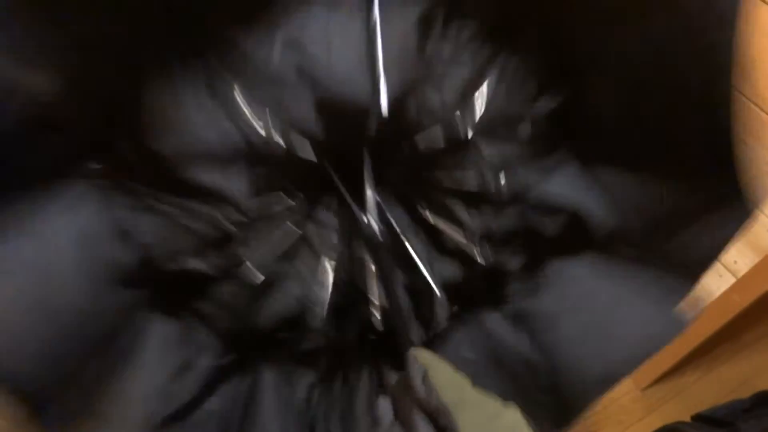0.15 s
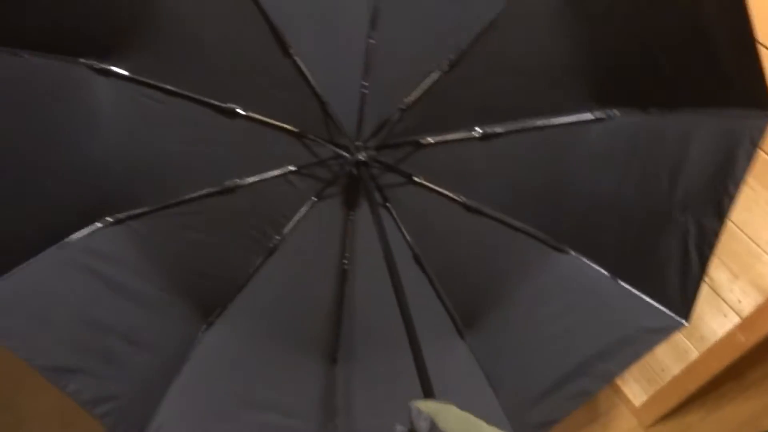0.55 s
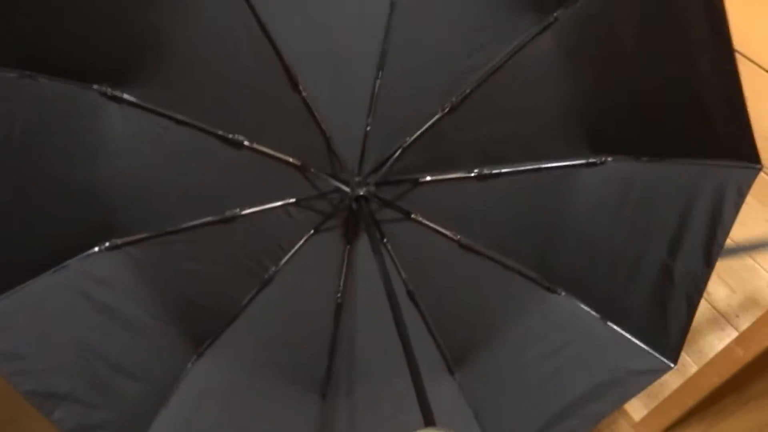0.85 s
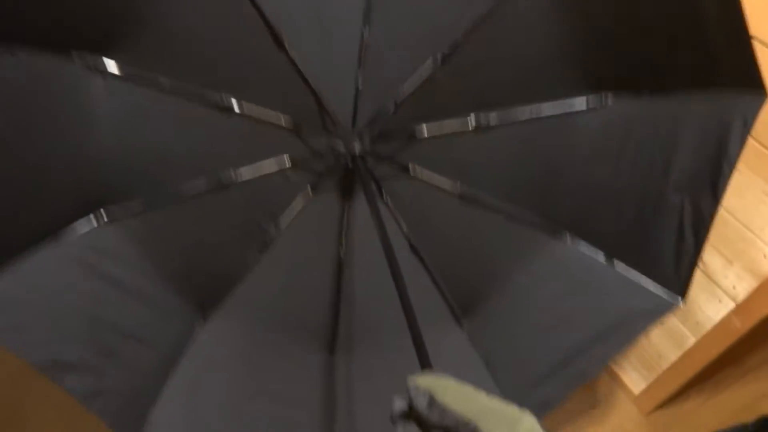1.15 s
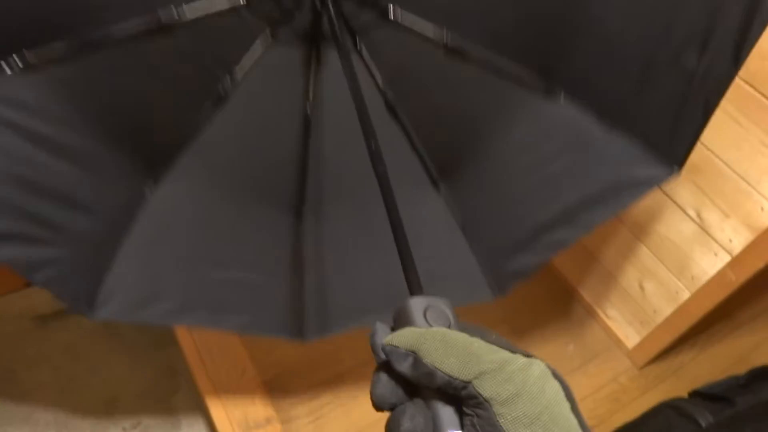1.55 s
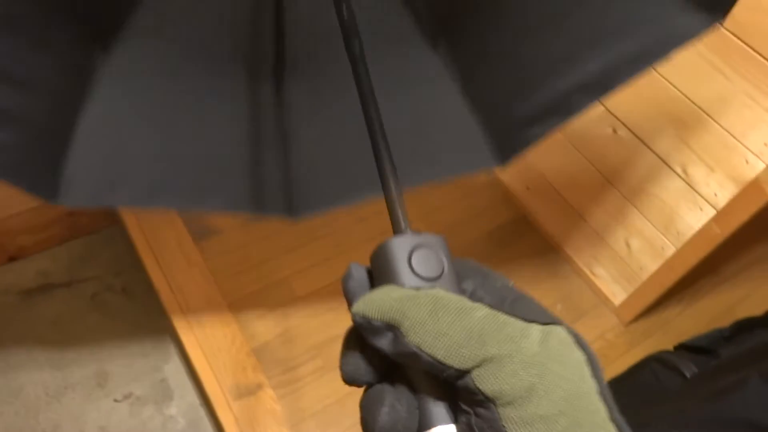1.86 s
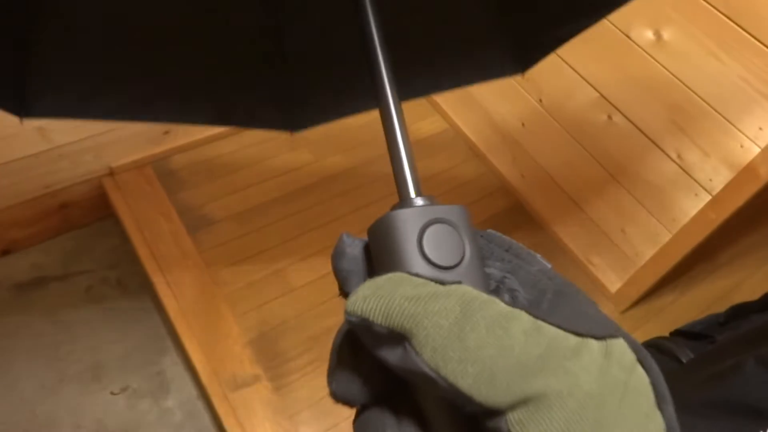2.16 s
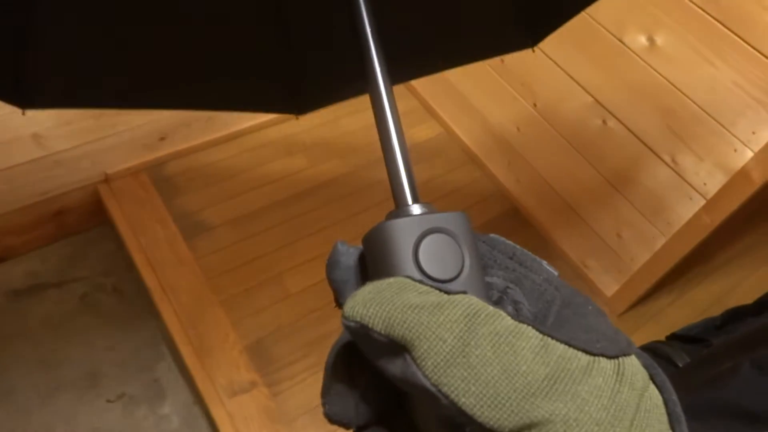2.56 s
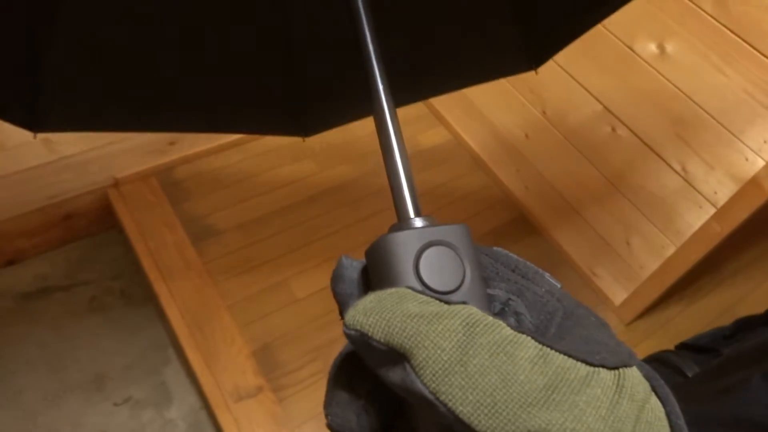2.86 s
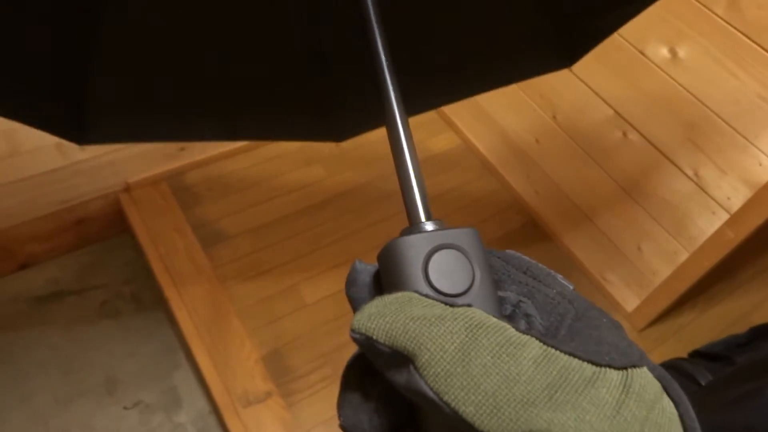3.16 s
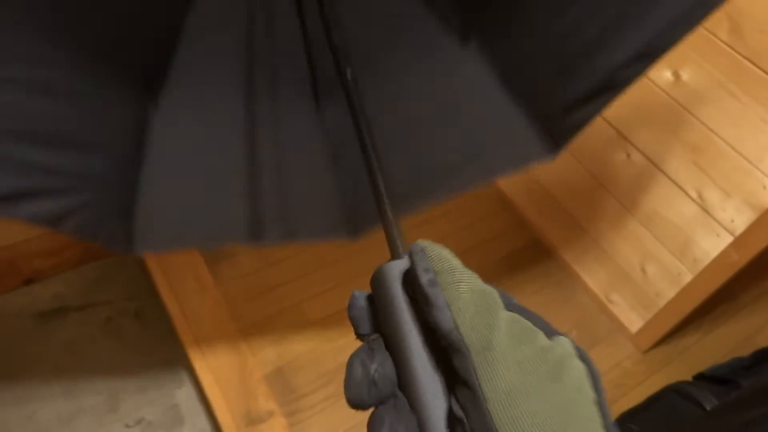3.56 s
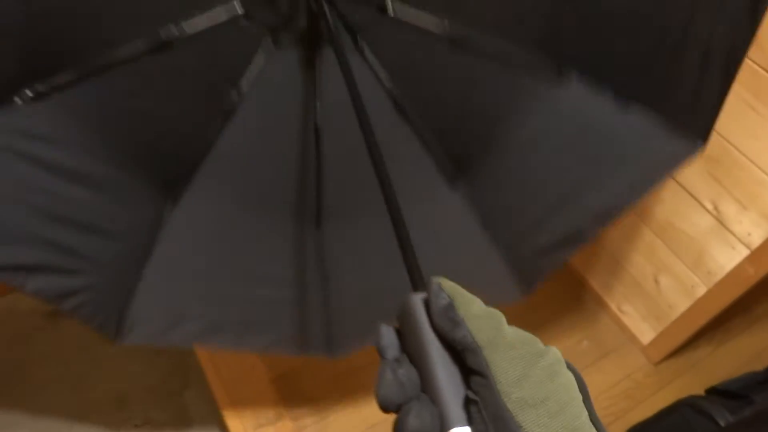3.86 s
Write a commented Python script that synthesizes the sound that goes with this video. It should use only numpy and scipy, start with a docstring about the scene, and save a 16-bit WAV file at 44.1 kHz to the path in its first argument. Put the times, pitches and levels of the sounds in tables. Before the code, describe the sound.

An automatic umbrella springs open with a loud snap, followed by faint ticks and rubbing.

```python
"""Automatic umbrella springing open

Close by in a small wood-panelled room, the steel runner scrapes up the shaft and the ribs clatter.
Folds of cloth crackle, the panels flap taut and drum on the canopy, and the catch snaps home.
Then the frame ticks and knocks as it settles, a gloved hand bumps the handle, and a light rub
makes the canopy drone and its weave hiss with a thin, gliding zip, over faint room tone."""
import sys
import numpy as np
from scipy import signal
from scipy.fft import rfft, irfft, next_fast_len
from scipy.io import wavfile
from scipy.ndimage import uniform_filter1d

SR = 44100
rng = np.random.default_rng(int(sys.argv[2]) if len(sys.argv) > 2 else 0)


def to_wav(sig):
    """Store sig (one row per channel, or 1-D mono) as 16-bit WAV at the path in sys.argv[1].

    Samples outside -1..1 are clipped; the rate is SR.
    """
    pcm = np.clip(np.atleast_2d(sig), -1, 1) * 32767
    pcm = np.round(pcm).astype(np.int16)
    wavfile.write(sys.argv[1], SR, pcm.T)  # frames by channels


N = 176400
T = np.arange(N) / SR

# drum-like ring of the taut canopy: f/Hz, width/Hz, level/dB
CANOPY_MODES = [(139, 16, 1), (327.5, 22, 12), (407, 15, -1.5), (766, 61, 2.5)]
# bright tone of the frame's joints: f/Hz, level/dB
JOINT_TONE = [(400, -5.5), (4700, -8.5), (6300, -0.5), (11000, -6)]
# fuller tone of the catch and handle: f/Hz, level/dB
CLICK_TONE = [(100, -16.5), (500, -4.5), (2300, -6.5), (3600, -4), (4900, -8), (6500, 0), (11000, -7)]


def runner(per_s=6000, spread_db=3):
    """Steel slides on steel: dense contacts ring the shaft and ribs."""
    # envelope of the slide: t/s, level/dB
    slide = [(0, -32.5), (.06, -37), (.145, -32.5), (.195, -32), (.255, -38.5), (.285, -31.5), (.325, -33),
             (.36, -32), (.40, -42), (.48, -59.5)]
    # ring of the steel: f/Hz, level/dB
    steel = [(1000, -15.5), (2600, -10.5), (3800, -7), (4900, -12), (5800, -6.5), (6700, -1), (7600, -5),
             (8700, -2), (10000, -9), (11000, -13)]
    mid, side = [colour(grains(per_s, spread_db) * level(slide), steel) for _ in range(2)]
    return stereo(mid, side, pan_db=0.5)


def cloth(per_s=2500, spread_db=3, ring_db=-6.5):
    """Folds crackle as they are dragged apart, and ring the canopy."""
    # envelope of the unfolding: t/s, level/dB
    unfold = [(0, -48.5), (.14, -50), (.2, -39), (.28, -35), (.35, -37.5), (.395, -38), (.43, -46),
              (.465, -45.5), (.51, -54.5)]
    # tone of the rustle: f/Hz, level/dB
    rustle = [(100, -16), (300, -3), (800, 0.5), (2300, -6.5), (3600, -10.5), (11000, -27.5)]
    folds = np.array([grains(per_s, spread_db) for _ in range(2)]) * level(unfold)
    folds = folds + from_db(ring_db) * canopy_ring(folds)
    return stereo(*colour(folds, rustle), pan_db=-1.25, side_db=-7)


def canopy(per_s=700, spread_db=2):
    """Panels flap taut and drum on the canopy."""
    # swell as the canopy fills: t/s, level/dB
    fill = [(0, -58.5), (.13, -61), (.2, -39), (.27, -39.5), (.322, -32.5), (.385, -27), (.41, -31.5),
            (.46, -43), (.5, -76)]
    # bassy body of the flap: f/Hz, level/dB
    body = [(20, -6), (85, -9.5), (135, 2), (260, -3.5), (600, -13), (1200, -26), (4000, -44.5)]
    flaps = grains(per_s, spread_db)
    return rms_one(colour(flaps + canopy_ring(flaps), body)) * level(fill)


def canopy_ring(x):
    """The stretched cloth rings in its modes like a drumhead."""
    return sum(from_db(db) * resonate(x, hz, width) for hz, width, db in CANOPY_MODES)


def catch():
    """The catch snaps home and rebounds."""
    # snaps: t/s, level/dB, f/Hz, decay/ms
    snaps = [(.3356, -20, 3670, 1.73), (.3376, -13, 6400, 2), (.4371, -24, 3760, 2)]
    return contacts(snaps, CLICK_TONE, ring_width_hz=2200, ring_db=-4)


def ribs():
    """The ribs clash as they spread."""
    # clashes: t/s, level/dB, f/Hz, decay/ms
    clashes = [(.0015, -25, 8750, 2), (.1362, -26.5, 7850, 4), (.1534, -21.5, 8900, 2.7),
               (.1628, -19, 8200, 3.8), (.3322, -20.5, 9700, 2)]
    return contacts(clashes, JOINT_TONE, ring_width_hz=1400, ring_db=2.5)


def joints():
    """Joints slip and tick as the frame settles."""
    # slips: t/s, level/dB, f/Hz, decay/ms
    slips = [(.6283, -42, 7800, 6.7), (1.2296, -43.5, 6800, 2.7), (1.24, -53, 7100, 13),
             (1.271, -46.5, 8800, 1.5), (1.8335, -57, 7040, 6), (1.8455, -53.5, 7060, 7.2)]
    return contacts(slips, JOINT_TONE, ring_width_hz=3000, ring_db=-10)


def frame_knocks(crack_db=-3, crack_s=0.016):
    """The frame shifts under the taut cloth: each knock cracks and rings, a soft one only low modes."""
    # blows, brighter when harder: t/s, level/dB, top f/Hz
    blows = [(1.2306, -47.5, 600), (1.2395, -44.5, 2000), (1.253, -44.5, 616), (1.2748, -51.5, 300)]
    # ring of the frame: f/Hz, level/dB, t60/s
    modes = [(191, -2, 0.17), (273, -3.5, 0.054), (436, 10.5, 0.013), (885, 1.5, 0.023), (1113, -15, 0.11)]
    out, age = np.zeros(N), T[:SR // 2]
    for s, db, top_hz in blows:
        crack = rng.standard_normal(len(age)) * np.exp(-age / crack_s)
        knock = from_db(crack_db) * resonate(crack, hz=2400, width_hz=2800)
        for hz, mode_db, t60 in modes:
            reach = 1 / np.hypot(1, (hz / top_hz) ** 2)
            decay = from_db(mode_db + rng.normal(0, 1) - 60 * age / t60)
            knock += reach * decay * np.sin(2 * np.pi * hz * age)
        out[int(s * SR):][:len(age)] += from_db(db) * knock
    return low_cut(out, hz=140)


def handle_bumps(ring_db=-4):
    """Each soft push gives the handle one dull pulse, and the canopy rings faintly after it."""
    # bumps of the gloved hand: t/s, level/dB, width/ms
    bumps = [(0.857, -45.5, 0.93), (1.076, -53.5, 1.8), (1.102, -48.5, 0.86), (1.588, -48, 1.5),
             (1.691, -56, 1.7), (1.8663, -48, 1.05), (1.876, -47.5, 0.76), (1.883, -46, 0.59)]
    push = np.zeros(N)
    for s, db, width_ms in bumps:
        u = np.clip(1000 * (T - s) / width_ms, 0, 60)  # age in pulse widths
        push += from_db(db) * u * u * (u - 3) * np.exp(-u)
    push = low_cut(push, hz=65)
    return push + from_db(ring_db) * resonate(push, hz=140, width_hz=40)


def handle_ticks():
    """Small, dry contacts at the handle."""
    # ticks: t/s, level/dB, f/Hz, decay/ms
    ticks = [(3.6248, -52, 8140, 5.1), (3.6947, -56.5, 8800, 5.1)]
    return contacts(ticks, CLICK_TONE, ring_width_hz=610, ring_db=-7)


def rub():
    """Light rubbing: the canopy drones and the weave hisses."""
    # envelopes of drone and hiss: t/s, level/dB
    drone_curve = [(1.3, -77), (1.6, -77.5), (1.86, -74.5), (2.0, -80), (2.3, -98), (2.35, -70.5),
                   (2.85, -66.5), (3.22, -68.5), (3.3, -87)]
    hiss_curve = [(2.3, -90), (2.76, -81), (2.84, -67.5), (2.89, -85), (3.08, -82), (3.17, -69.5),
                  (3.26, -78), (3.35, -73.5), (3.6, -68.5), (3.74, -79)]
    # their tones: f/Hz, level/dB
    drone_tone = [(150, -30), (255, -18), (315, 2), (385, -5), (420, -16), (490, -6.5), (720, -39)]
    hiss_tone = [(4000, -25.5), (6600, 3.5), (8400, 2), (11000, -8)]
    drone = colour(rng.standard_normal(N), drone_tone) * level(drone_curve)
    hiss = colour(rng.standard_normal((2, N)), hiss_tone) * level(hiss_curve)
    return drone + stereo(*hiss, pan_db=1)


def weave_zips(waver_hz=35, waver_db=2.2, jitter_hz=60):
    """Threads pass a contact and whistle; an uneven rub makes pitch and level waver together."""
    # glides whose pitch follows the speed of the rub: t/s, f/Hz, level/dB
    main_zip = [(2.42, 6510, -99), (2.478, 7768, -66.5), (2.512, 7130, -82), (2.538, 8020, -54.5),
                (2.558, 7480, -72), (2.646, 7540, -75.5), (2.705, 8000, -66), (2.785, 8120, -70),
                (2.862, 7070, -74), (2.905, 8350, -75.5), (2.973, 7520, -68.5), (3.042, 7640, -69),
                (3.12, 6416, -80)]
    high_arch = [(2.57, 10060, -88), (2.665, 10120, -86), (2.725, 11050, -85), (2.775, 10120, -85),
                 (2.95, 10100, -87)]  # fainter, above it
    falling_slip = [(.52, 8200, -68), (.578, 6900, -66.5)]  # the opened cloth comes to rest
    out = np.zeros(N)
    for glide in (main_zip, high_arch, falling_slip):
        s, hz, _ = np.transpose(glide)
        speed = wobble(length_s=0.025)
        pitch = np.interp(T, s, hz) + waver_hz * speed + jitter_hz * wobble(length_s=0.00074)
        whistle = np.sqrt(2) * np.sin(2 * np.pi * np.cumsum(pitch) / SR)
        out += level(glide) * from_db(waver_db * speed) * whistle
    return out


def room(x, wet_db, build_s=0.004, side_db=-11.5):
    """Add the dense reflections of the wooden walls, each octave dying at its own rate."""
    # reverb time: f/Hz, t60/s
    t60 = [(100, 0.49), (4000, 0.32), (11000, 0.18)]
    t, tail = T[:SR * 3 // 4], 0
    edges = np.geomspace(60, 15360, 9)
    for low, high in zip(edges, edges[1:]):
        octave = signal.butter(2, [low, high], "band", fs=SR, output="sos")
        band = signal.sosfilt(octave, rng.standard_normal((2, len(t))))
        tail = tail + band * from_db(-60 * t / at_hz(t60, np.sqrt(low * high)))
    tail = tail * (1 - np.exp(-t / build_s))
    mid, side = tail / np.sqrt(np.sum(tail[0] ** 2))
    walls = mid + from_db(side_db) * side * [[1], [-1]]
    return x + from_db(wet_db) * signal.fftconvolve(np.atleast_2d(x), walls, axes=1)[:, :N]


def room_tone(level_db=-68.5, peaks_db=3):
    """A faint, airy hiss with steady resonances."""
    # tone of the air and its resonances: f/Hz, level/dB
    air = [(25, -6.5), (160, -1.5), (470, -4), (1050, -4), (2300, -10.5), (3700, -8), (5200, -17.5),
           (7500, -15), (11000, -23.5)]
    peaks = [(325, -5.5), (620, -2.5), (1060, -2.5), (1570, -4), (2000, -1), (3500, -3.5)]
    noise = rng.standard_normal((2, N))
    ring = sum(from_db(peaks_db + db) * resonate(noise, hz, width_hz=45 + 0.04 * hz) for hz, db in peaks)
    mid, side = from_db(level_db) * rms_one(colour(noise + ring, air))
    return stereo(mid, side, pan_db=0)


def contacts(rows, spectrum, ring_width_hz, ring_db):
    """Each contact chatters for a few milliseconds, stops abruptly and favours one ring of the steel."""
    out, t = np.zeros(N + SR), T[:SR // 10]
    for s, db, hz, decay_ms in rows:
        chatter = rng.choice([-1., 1.], len(t))
        ring = rms_one(resonate(chatter, hz, ring_width_hz))
        burst = rms_one(chatter + from_db(ring_db) * ring)
        out[int(s * SR):][:len(t)] += from_db(db) * burst * np.exp(-(1000 * t / decay_ms) ** 2)
    return colour(out[:N], spectrum)


def grains(per_s, spread_db):
    """Random tiny contacts of uneven size; rms 1."""
    sizes = from_db(spread_db * np.minimum(rng.exponential(1, N), 4)) * rng.choice([-1, 1], N)
    return rms_one(sizes * (rng.random(N) < per_s / SR))


def wobble(length_s):
    """Random drift that changes over the given time; rms 1."""
    return rms_one(uniform_filter1d(rng.standard_normal(N), int(length_s * SR)))


def stereo(mid, side, pan_db, side_db=0):
    """Left and right of a broad source, widest in the midrange."""
    # stereo width: f/Hz, side level/dB
    width = [(300, -8), (600, -4.5), (1100, -4.5), (11000, -10.5)]
    sign = np.array([[1], [-1]])
    side = from_db(side_db) * colour(side, width, keep_power=False)
    return (mid + sign * side) * from_db(sign * pan_db / 2)


def colour(x, spectrum, keep_power=True):
    """Minimum-phase EQ with the given spectrum."""
    size = next_fast_len(N + SR // 4, real=True) // 2 * 2
    gain = from_db(at_hz(spectrum, np.arange(size // 2 + 1) * SR / size))
    cepstrum = irfft(np.log(rms_one(gain) if keep_power else gain))
    cepstrum[1:size // 2] *= 2
    cepstrum[size // 2 + 1:] = 0
    return irfft(rfft(x, size) * np.exp(rfft(cepstrum)))[..., :N]


def resonate(x, hz, width_hz):
    """One resonance with gain 1 at its top."""
    r = np.exp(-np.pi * width_hz / SR)
    feedback = [1, -2 * r * np.cos(2 * np.pi * hz / SR), r * r]
    return signal.lfilter(np.array([1, 0, -1]) * (1 - r * r) / 2, feedback, x + 1e-18)


def low_cut(x, hz):
    """Roll off the bass."""
    return signal.sosfilt(signal.butter(2, hz, "high", fs=SR, output="sos"), x)


def level(rows):
    """Gain over time from the first and last columns; silent outside the curve."""
    rows = np.array(rows)
    return from_db(np.interp(T, rows[:, 0], rows[:, -1], left=-140, right=-140))


def at_hz(points, hz):
    """Read a table along log frequency."""
    points = np.array(points)
    return np.interp(np.log(hz + 1), np.log(points[:, 0]), points[:, 1])


def from_db(db):
    """Decibels to gain."""
    return 10 ** (np.asarray(db) / 20)


def rms_one(x):
    """Scale to unit rms."""
    return x / np.sqrt(np.mean(x ** 2) + 1e-20)


def scene():
    """The opening, the settling frame and the handling, each with its own reverb send."""
    opening = room(runner() + cloth() + canopy(), wet_db=-16.5)
    clatter = room(ribs(), wet_db=-10) + room(catch(), wet_db=-3)
    settling = room(joints(), wet_db=-1.5) + room(frame_knocks(), wet_db=-11)
    handle = room(handle_ticks() + handle_bumps(), wet_db=-14)
    rubbing = rub() + room(weave_zips(), wet_db=-10.5)
    return opening + clatter + settling + handle + rubbing + room_tone()


def record(dry):
    """A steep high cut takes off the very top."""
    cutoff_hz = 11100
    return signal.sosfilt(signal.ellip(12, .1, 80, cutoff_hz, fs=SR, output="sos"), dry)


dry = scene()
out = record(dry)
to_wav(out)
```